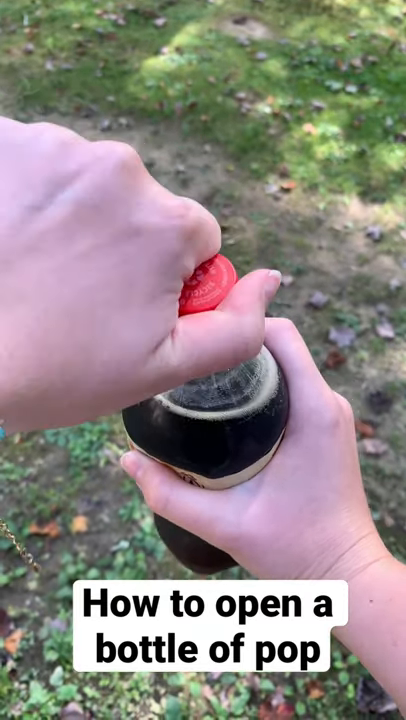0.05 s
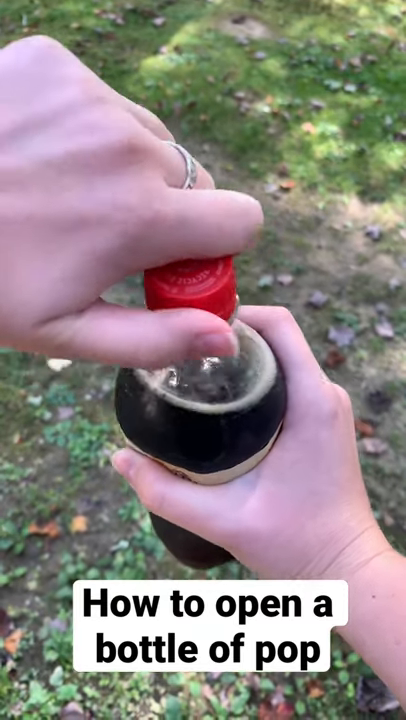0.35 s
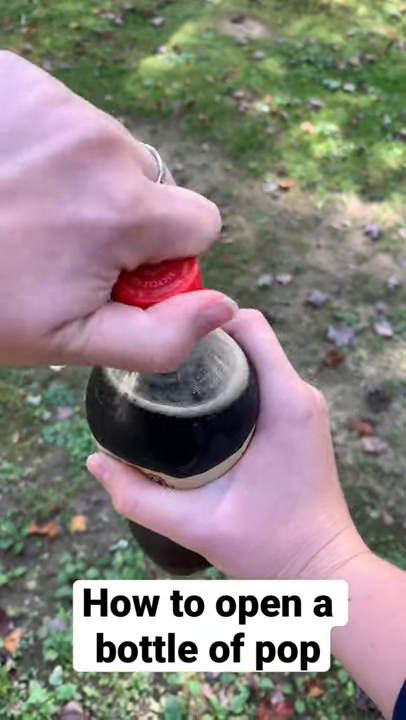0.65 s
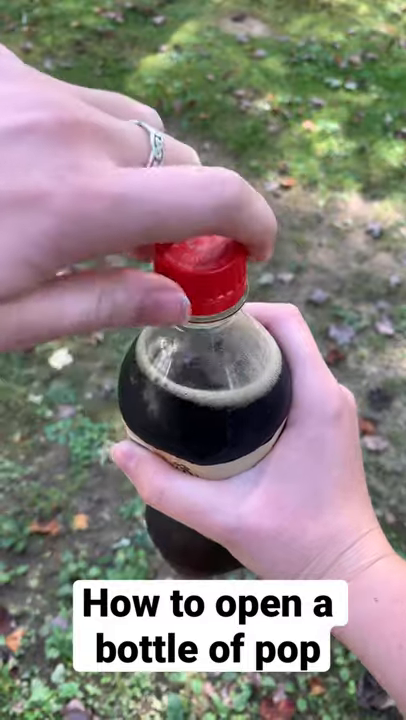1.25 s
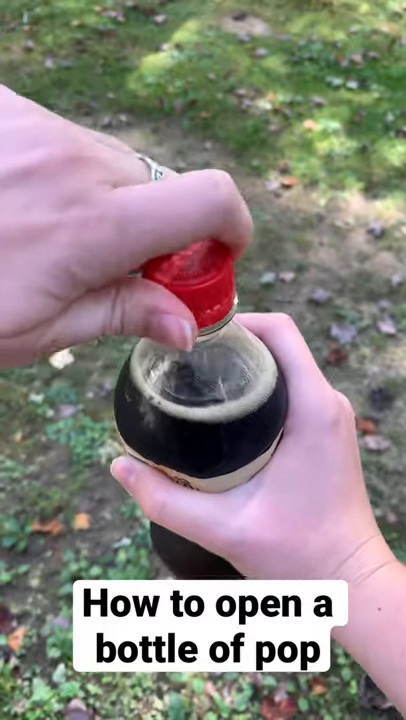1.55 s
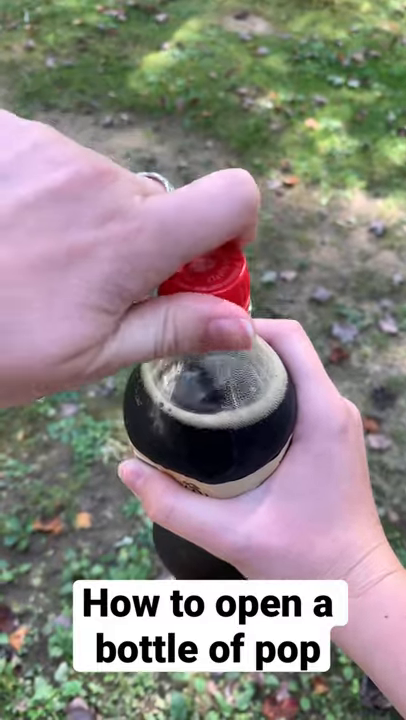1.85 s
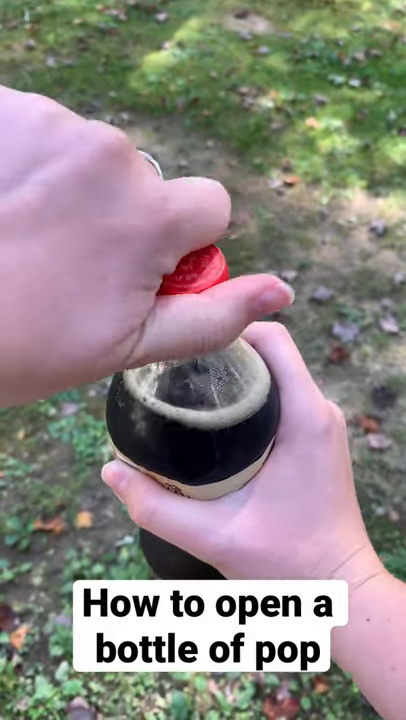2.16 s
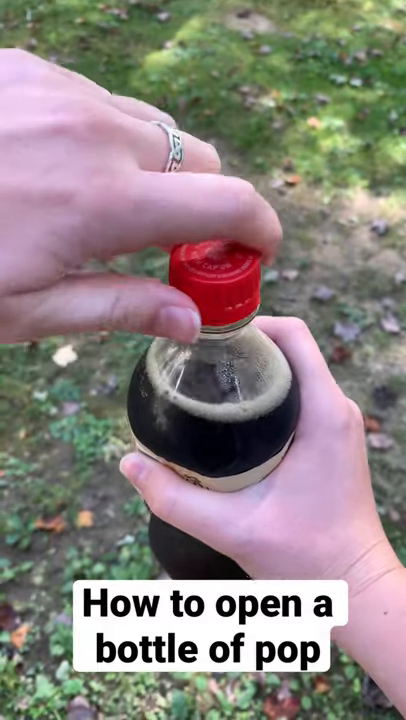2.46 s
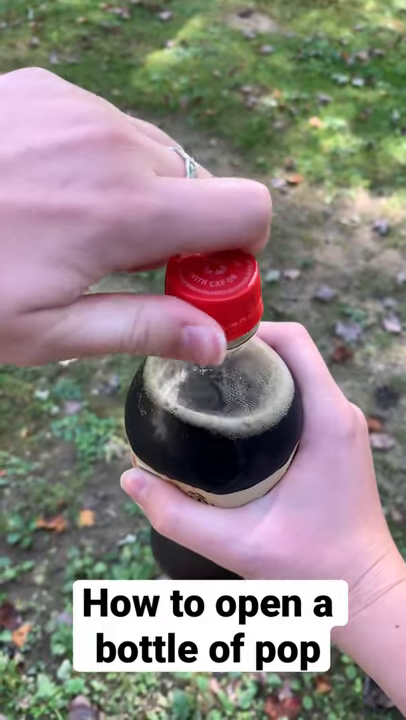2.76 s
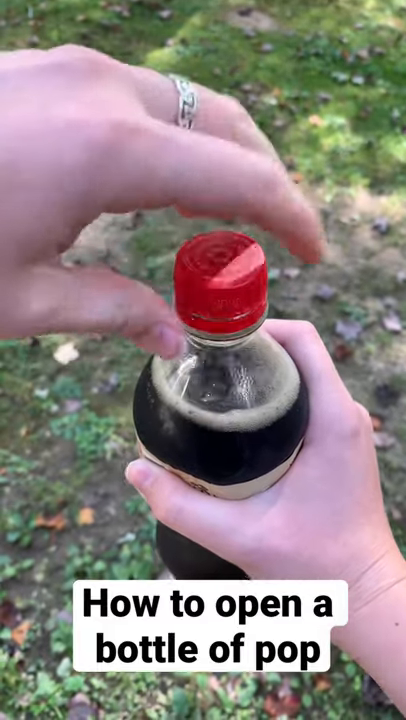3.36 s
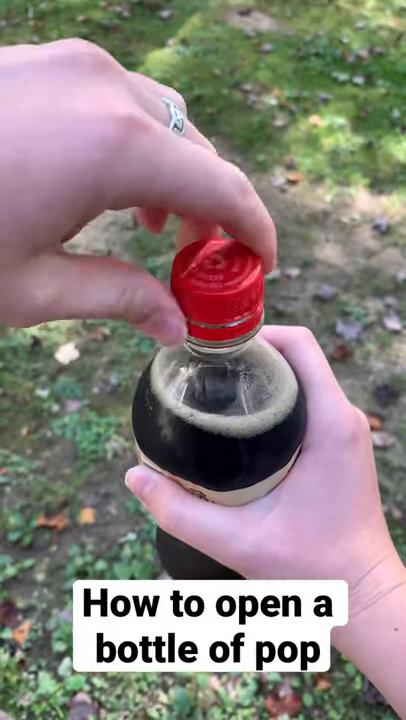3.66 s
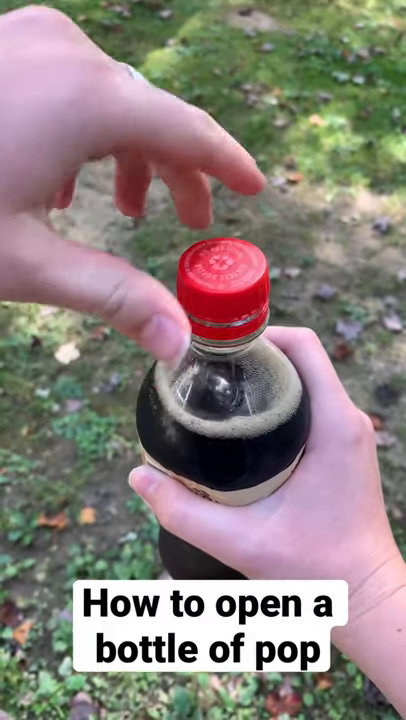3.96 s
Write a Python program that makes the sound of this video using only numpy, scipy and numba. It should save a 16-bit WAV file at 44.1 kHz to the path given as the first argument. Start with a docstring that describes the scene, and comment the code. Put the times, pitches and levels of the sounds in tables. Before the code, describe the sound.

A plastic cap is twisted on a soda bottle close to the microphone, giving a sharp snap, a few lighter clicks, then the hardest snap and soft finger scuffs. Quiet garden air and a distant engine hum lie behind.

```python
"""A far engine drones under soft garden air; close to a phone, a plastic cap is twisted on a soda bottle.
Fingers scuff its ribs between turns. The seal ring catches and snaps, ringing cap and bottle.
A faint cluster of high wavering tones swells just before the hardest snap.
The phone's gain dips after the loudest snaps."""
import sys
import numpy as np
from scipy import signal
from scipy.fft import rfft, irfft
from scipy.io import wavfile
from scipy.ndimage import uniform_filter1d
from numba import njit

SR = 44100
rng = np.random.default_rng(int(sys.argv[2]) if len(sys.argv) > 2 else 0)


def transcribe(u):
    """Save the signal u as a 16-bit wav file named by the first command-line argument.

    u: samples, shape (n,) or (channels, n), limited to [-1, 1]; the rate is SR.
    q: integer samples, one column per channel.
    """
    v = np.clip(np.atleast_2d(u).T, -1, 1)
    q = np.round(v * 32767).astype(np.int16)
    wavfile.write(sys.argv[1], SR, q)


N = 176400


def undb(db):
    """Decibels to gain."""
    return 10 ** (np.asarray(db) / 20)


def curve(points, size):
    """(Hz, value) points joined on a log axis, at the bins of a spectrum."""
    hz, value = np.array(points, float).T
    return np.interp(np.log(np.fft.rfftfreq(size, 1 / SR) + 1), np.log(hz), value)


def min_phase(db):
    """Spectrum of the promptest response with these gains."""
    cepstrum = irfft(db * np.log(10) / 20)
    half = len(cepstrum) // 2
    return np.exp(rfft(np.r_[cepstrum[0], 2 * cepstrum[1:half], cepstrum[half], np.zeros(half - 1)]))


def burst(decay_s, size):
    """Fading noise of unit energy."""
    x = rng.standard_normal(size) * np.exp(-np.arange(size) / SR / decay_s)
    return x / np.linalg.norm(x)


def drift(rate_hz):
    """Smooth random drift, spread near 1."""
    hold = int(SR / rate_hz)
    return uniform_filter1d(np.repeat(rng.standard_normal(N // hold + 1), hold), hold)[:N]


def smooth(x, tau_s):
    """One-pole low-pass."""
    pole = np.exp(-1 / (tau_s * SR))
    return signal.lfilter([1 - pole], [1, -pole], x)


def add(out, start_s, x):
    """Mix a sound in at its time."""
    i = int(start_s * SR)
    out[i:i + len(x)] += x[:N - i]


def engine(shaft_hz=18.68, wander=0.0047, level_db=-46.5, flutter_db=1):
    """Distant engine at near-steady speed; only low harmonics carry, each fluttering."""
    # Each row: multiple of the shaft rate, relative level in dB.
    harmonics = [(2, -21.5), (3, -13), (4, 0.5), (5, -6.5), (6, -14.5), (7, -7), (8, -14), (9, -15.5),
                 (10, -17.5)]
    angle = 2 * np.pi * np.cumsum(shaft_hz * (1 + wander * drift(1.926))) / SR
    out = np.zeros(N)
    for order, db in harmonics:
        rms = undb(level_db + db + flutter_db * drift(10))
        out += np.sqrt(2) * rms * np.sin(order * angle + 2 * np.pi * rng.random())
    return out


def air(swell_db=0.5):
    """Soft outdoor wash, alike on both sides in the bass."""
    # Air spectrum. Each row: frequency in Hz, density in dB per Hz.
    density = [(20, -100), (33, -80.5), (55, -69), (85, -67), (135, -70.5), (200, -80), (430, -81.5),
               (700, -88.5), (1300, -91), (2500, -95.5), (4200, -99), (5400, -103.5), (7300, -102),
               (8500, -108), (10000, -115), (15500, -125)]
    # Likeness at the two microphones. Each row: frequency in Hz, coherence from 0 to 1.
    coherence = [(100, 1), (250, 0.97), (430, 1), (700, 0.97), (1400, 0), (2400, 0.8), (4400, 0.17),
                 (7500, 1)]
    mid, side = rfft(rng.standard_normal((2, N)))
    alike = np.clip(curve(coherence, N), 0, 1)
    pair = mid * np.sqrt(1 + alike) + np.array([[1], [-1]]) * side * np.sqrt(1 - alike)
    wash = irfft(pair * undb(curve(density, N))) * np.sqrt(SR) / 2
    return wash * undb(swell_db * drift(4.21))


def scuffs(grain_db=6, size=8192):
    """Fingers and thread rub: grainy friction that swells and fades."""
    # Each row: start in seconds, length in seconds, level in dB, treble tilt in dB per octave.
    strokes = [(0.191, 0.032, -62.5, 29), (0.977, 0.031, -68, 32), (2.273, 0.025, -53, 9.5),
               (2.4, 0.04, -63, 11), (3.15, 0.0042, -45.5, 4), (3.154, 0.0081, -48.5, 2),
               (3.173, 0.0038, -48, 4), (3.177, 0.0052, -48.5, 4), (3.14, 0.061, -55, 2.5),
               (3.5043, 0.0029, -47, 0), (3.631, .003, -49.5, 2), (3.645, 0.054, -52, 1.5),
               (3.69, 0.0022, -53, 7.5), (3.6957, 0.0024, -45, 4.5), (3.701, 0.017, -55, -2),
               (3.75, 0.0074, -44, 0.5), (3.76, 0.0084, -47, 6.5), (3.789, 0.0024, -45.5, 5)]
    # Friction spectrum. Each row: frequency in Hz, relative level in dB.
    rub_colour = [(150, -16.5), (380, 19), (700, 18), (2400, 7), (4200, 1.5), (5200, -6.5), (7200, -7.5),
                  (8500, -30.5), (11000, -17.5), (16000, -39)]
    octaves = np.log2(np.clip(np.fft.rfftfreq(size, 1 / SR), 1000, 8000) / 3000)
    out, t = np.zeros(N), np.arange(size) / SR
    for start_s, length_s, db, tilt in strokes:
        slip, grain = rng.standard_normal((2, size))
        swell = np.sqrt(np.sin(np.pi * np.clip(t / length_s, 0, 1)).clip(0))
        colour = min_phase(curve(rub_colour, size) + tilt * octaves)
        rub = irfft(rfft(slip * undb(grain_db * grain) * swell) * colour)
        add(out, start_s, rub * undb(db) * np.sqrt(length_s * SR) / np.linalg.norm(rub))
    return out


def snaps(crunch_db=3, tab_db=13.5, tab_t60_s=0.0038, knock_rise_s=0.00072, size=8192):
    """A crack and a short crunch ring tab and cap; hard snaps also knock the hollow bottle."""
    # Seal snaps. Each row: start in seconds, crunch decay in ms, knock pitch in Hz, knock gain in dB,
    # cap ring gain in dB, tab pitch in Hz, then the drive in dB in each band.
    events = [(0.7590, 1.4, 322, -60, -4, 2700, -29, -16, -13, -18, -20, -34, -30),
              (0.7626, 0.17, 320, -26.5, -2, 6450, -0.5, -0.5, 3.5, 4, -6, 4.5, 3),
              (0.7642, 1.0, 322, -43.5, -0.5, 2940, -5, -2.5, -1.5, 0, 0.5, -10, -3),
              (1.6098, 0.23, 350, -65, -14, 4560, -31, -13, -16.5, -7, -7.5, -7.5, -2),
              (1.8121, 0.45, 350, -72, -10, 8950, -45, -28, -28, -21.5, -27, -21, -18),
              (1.9566, 0.96, 350, -67, -5, 4420, -17, 0.5, -6, -2, 1, -0.5, -10),
              (2.7464, 0.45, 343, -64, -10, 6390, -36, -4.5, -4, -4, -2.5, -2.5, 5.5),
              (2.9142, 0.84, 380, -25.5, 0, 5400, -3, 5, -3, 1.5, 7, 12, 4),
              (2.9162, 1, 383, -40.5, 0, 1804, -7.5, 0, 0, 0, -0.5, -6.5, -5),
              (3.7716, 0.61, 390, -33.5, 0, 2330, -13.5, -8, -11.5, -15.5, -29, -27, -42),
              (3.7746, 0.57, 430, -38.5, -1, 2370, -10, -20, -21, -20, -33, -42, -42)]
    # Centres of those bands in Hz.
    bands_hz = [1000, 2600, 4300, 6300, 8600, 10500, 14500]
    # Cap ring. Each row: frequency in Hz, dB over the bare crack before ring gain, T60 in seconds.
    cap_modes = [(504, 10.5, 0.02), (1170, 4.5, 0.0064), (2338, 13, 0.022), (2850, 1.5, 0.006),
                 (3170, 11.5, 0.018), (3730, 5.5, 0.019), (4340, 5.5, 0.0035), (7090, 0.5, .004),
                 (10370, 5, 0.00163)]
    # How well the plastic radiates. Each row: frequency in Hz, gain in dB.
    radiation = [(100, -32), (240, -13.5), (340, -0.5), (680, -7.5), (950, 5.5), (1350, -0.5), (1700, -7),
                 (2050, -1.5), (2350, 0), (3800, -1.5), (5000, 7.5), (11000, -3), (12500, -2.5),
                 (14000, -2), (16500, -9.5)]
    # Hollow bottle. Each row: multiple of the knock pitch, relative level in dB, T60 in seconds.
    bottle_modes = [(1, 3, .04), (1.18, -6.5, 0.051), (.8, -16.5, .025)]
    out, hz, t = np.zeros(N), np.fft.rfftfreq(size, 1 / SR), np.arange(size // 2) / SR
    for start_s, crunch_ms, knock_hz, knock_db, ring_db, tab_hz, *bands_db in events:
        modes = [(f, db + ring_db, t60) for f, db, t60 in cap_modes] + [(tab_hz, tab_db, tab_t60_s)]
        ring_power = 1 + sum(undb(db) ** 2 / (1 + ((hz - f) * 2 * np.pi * t60 / np.log(1000)) ** 2)
                             for f, db, t60 in modes)
        force = 1 + undb(crunch_db) * rfft(burst(crunch_ms / 1000, size))  # impulse plus crunch
        force /= np.sqrt(uniform_filter1d(np.abs(force) ** 2, size=200))  # flatten, keep fine ripple
        drive_db = curve(list(zip(bands_hz, bands_db)), size)
        colour = min_phase(drive_db + curve(radiation, size) + 10 * np.log10(ring_power))
        crack = irfft(force * colour)[:size // 2]
        body = sum(undb(db) * np.sin(2 * np.pi * knock_hz * ratio * t) * np.exp(-t * np.log(1000) / t60)
                   for ratio, db, t60 in bottle_modes)
        knock = undb(knock_db) * body * (1 - np.exp(-t / knock_rise_s))
        add(out, start_s, crack + knock)
    return out


def swelling_tones(start_s=2.885, length_s=0.036, level_db=-37, waver=0.017):
    """A faint cluster of high wavering tones swells just before the hardest snap."""
    # Each row: frequency in Hz, relative level in dB.
    tones = [(3200, -6), (3450, -9), (4050, -8.5), (5120, 1), (5500, -1), (5950, 2), (6700, -8.5),
             (8000, -9.5)]
    rise = np.linspace(0, 1, int(length_s * SR))
    bend = 1 + waver * drift(300)[:len(rise)]
    cluster = sum(undb(db) * np.sin(2 * np.pi * (np.cumsum(hz * bend) / SR + rng.random()))
                  for hz, db in tones)
    out = np.zeros(N)
    add(out, start_s, undb(level_db) * rise * cluster)
    return out


def garden(x, echo_s=0.0076, echo_db=-17.5, hands_db=-17.5, hands_t60_s=0.018,
           wash_db=-28, wash_t60_s=0.21, size=4096):
    """Scatter from the hands, a blurred echo off the ground, a faint wash from the garden."""
    # Scatter from leaves and ground. Each row: frequency in Hz, gain in dB.
    wash_colour = [(200, -8), (1000, -3), (2500, 4.5), (5000, 5), (8000, 2.5), (10500, 1), (12500, -7),
                   (15500, -6)]
    sides, lag = [], int(echo_s * SR)
    delayed_power = np.r_[np.zeros(lag), x[:-lag]] ** 2 + 1e-18
    tail = np.sqrt(smooth(delayed_power, wash_t60_s / (2 * np.log(1000))))
    echo = np.r_[np.zeros(lag), undb(echo_db) * burst(decay_s=0.00075, size=size - lag)]
    for _ in range(2):
        near = undb(hands_db) * burst(hands_t60_s / np.log(1000), size) + echo
        wash = irfft(rfft(rng.standard_normal(N)) * undb(curve(wash_colour, N)))
        sides.append(x + signal.fftconvolve(x, near)[:N] + undb(wash_db) * tail * wash)
    return np.array(sides)


def microphones(sound):
    """The two microphones differ in phase and level across the spectrum."""
    # Each row: frequency in Hz, lead of left over right in radians.
    phase_lead = [(0, 0), (200, -.3), (430, -.7), (780, -2.6), (1300, -5.1), (2800, -4.7), (3300, -3.8),
                  (4200, -4.7), (5000, -3.1), (8500, 0), (12000, 2.9), (16000, 6.2)]
    # Each row: frequency in Hz, level of left over right in dB.
    balance = [(70, -0.6), (200, -1), (330, -1.5), (600, 1), (880, -5), (1250, 0), (2300, -0.5), (3200, -1),
               (4200, 1.5), (5000, 1), (6300, 0)]
    lead_rad = np.interp(np.fft.rfftfreq(N, 1 / SR), *np.array(phase_lead).T)
    share = np.array([[0.5], [-0.5]])
    return irfft(rfft(sound) * np.exp(1j * share * lead_rad) * undb(share * curve(balance, N)))


def scene():
    """Snaps, swelling tones and scuffs over engine and air, in stereo."""
    foreground = snaps() + swelling_tones() + scuffs()
    return microphones(garden(foreground) + engine() + air())


@njit
def follow(x, release_s):
    """Peak follower with a slow release."""
    out, peak = np.empty(len(x)), 0.
    decay = np.exp(-1 / (release_s * SR))
    for i in range(len(x)):
        peak = max(x[i], peak * decay)
        out[i] = peak
    return out


def record(dry, threshold_db=-28.5, slope=0.4, detect_s=0.038, ceiling=0.8, top_hz=16600):
    """The gain ducks just after loud snaps and recovers; peaks are rounded and the top is cut."""
    rms = np.sqrt(smooth(np.mean(dry ** 2, axis=0), detect_s))
    level_db = 20 * np.log10(follow(rms, release_s=0.26) + 1e-9)
    duck_db = smooth(slope * np.maximum(level_db - threshold_db, 0), detect_s)
    rounded = ceiling * np.tanh(dry * undb(-duck_db) / ceiling)
    return signal.sosfilt(signal.ellip(8, 0.2, 70, top_hz, fs=SR, output="sos"), rounded)


dry = scene()
out = record(dry)
transcribe(out)
```